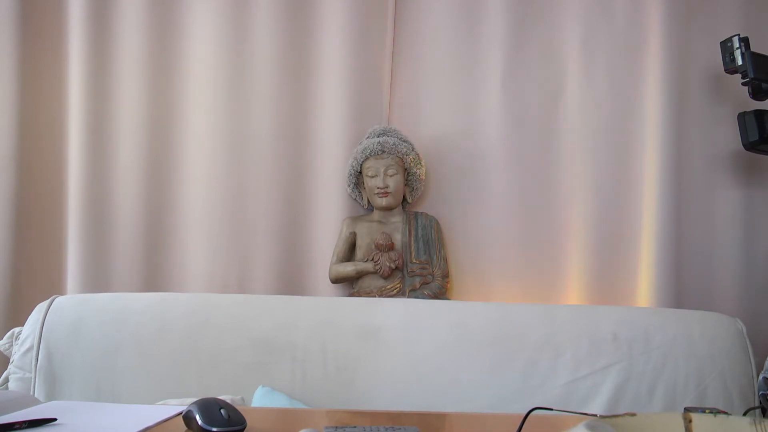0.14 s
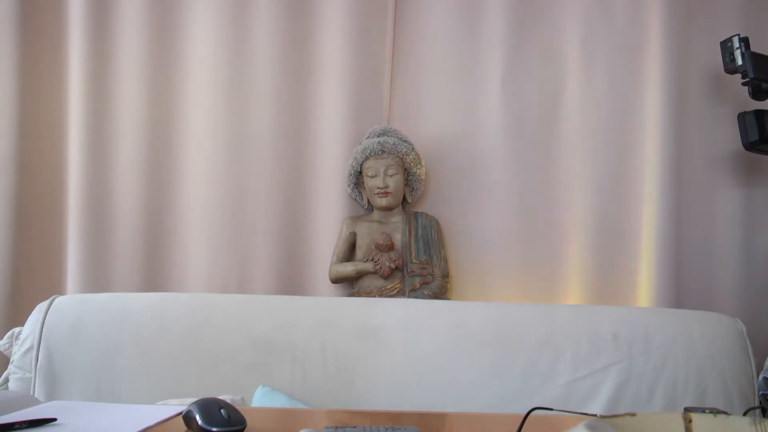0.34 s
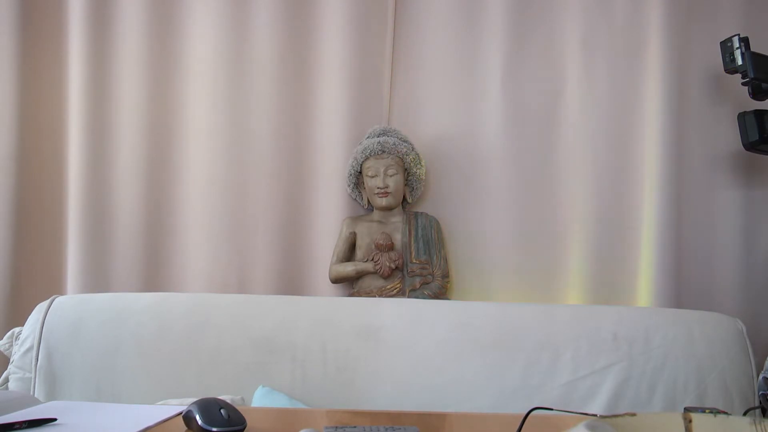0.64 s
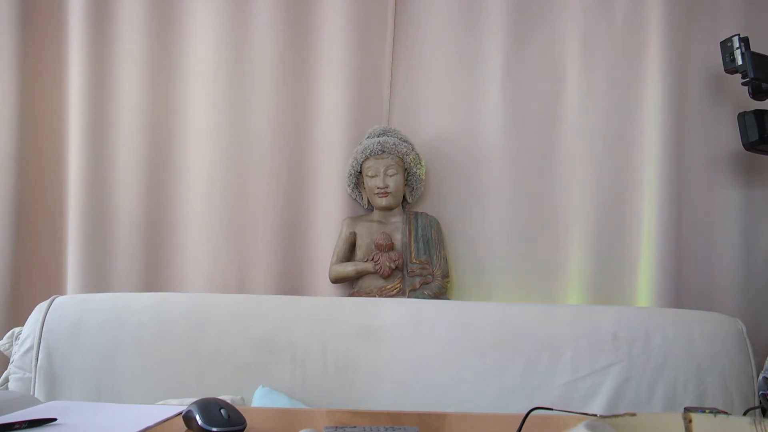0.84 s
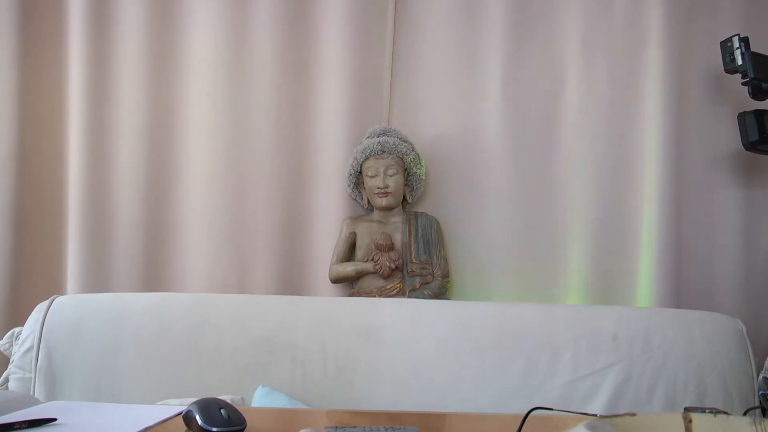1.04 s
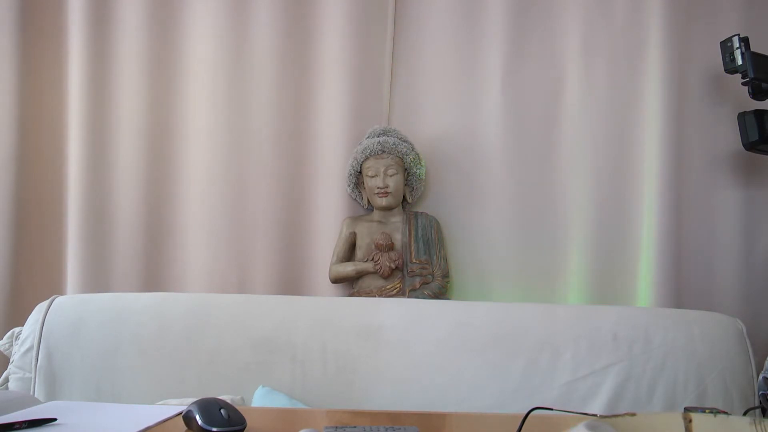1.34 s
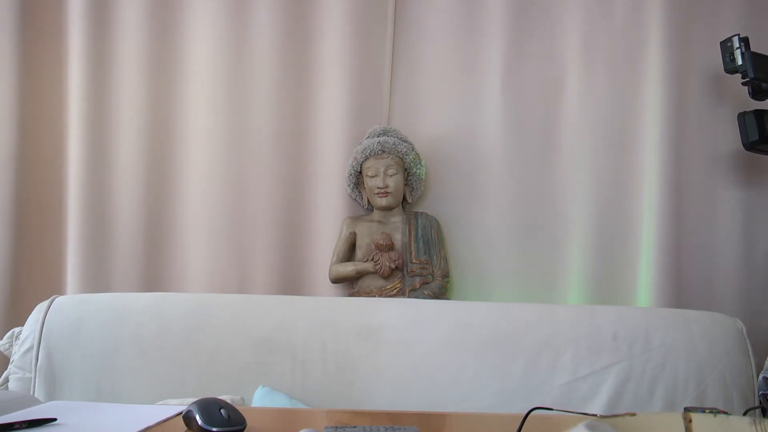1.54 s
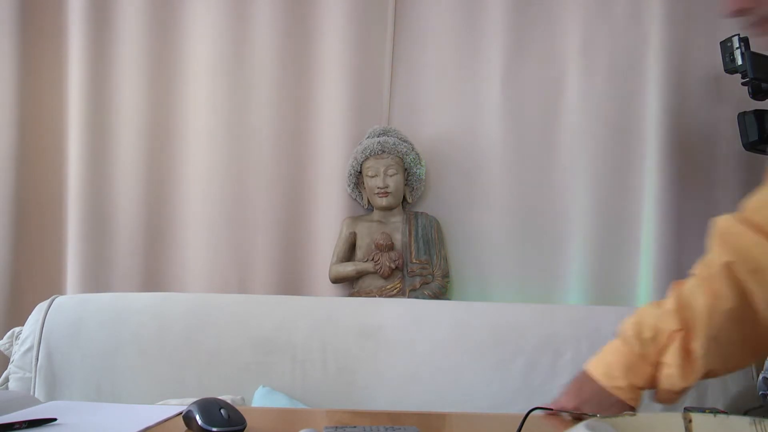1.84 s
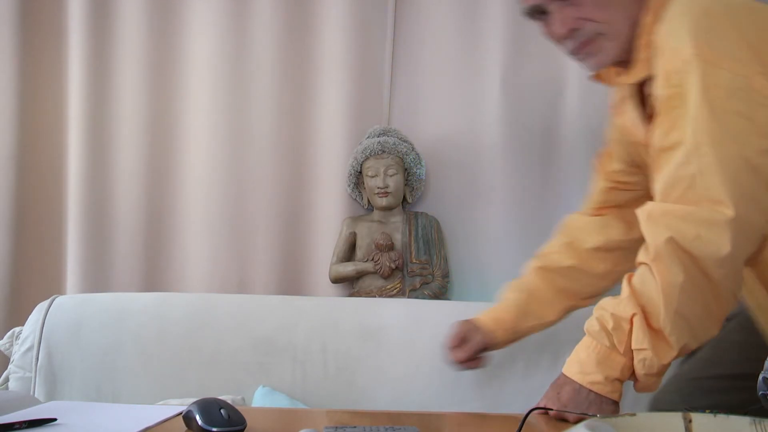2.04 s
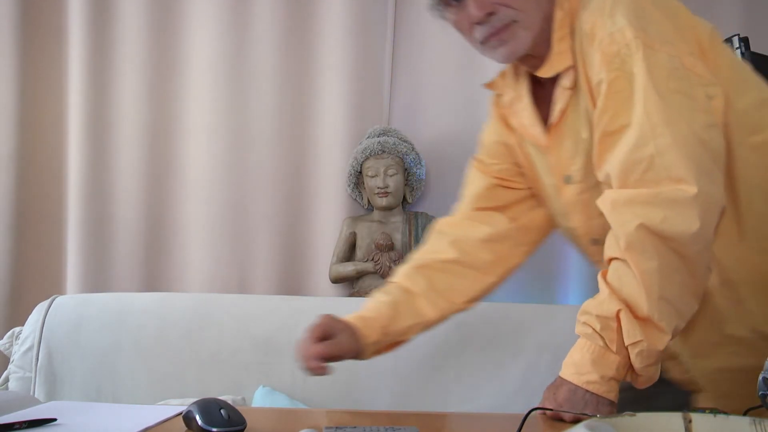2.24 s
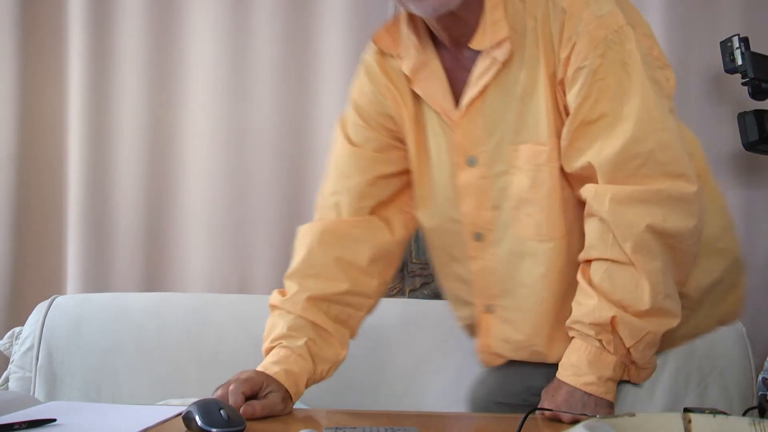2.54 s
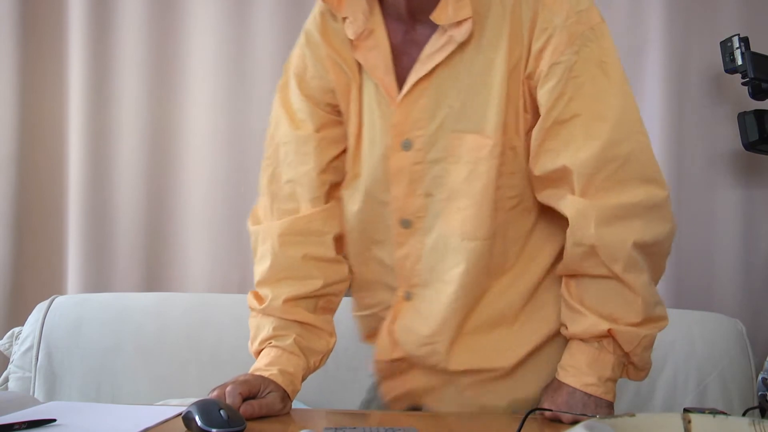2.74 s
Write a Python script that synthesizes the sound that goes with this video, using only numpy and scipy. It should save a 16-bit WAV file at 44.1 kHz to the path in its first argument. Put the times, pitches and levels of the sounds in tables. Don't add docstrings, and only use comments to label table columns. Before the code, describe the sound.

Deep hollow thumps on a wooden desk, first a short cluster, then heavier knocks with rattles and ticks as someone leans on it, clothes rustling softly; quiet room, close microphone on the desk.

```python
import sys
import numpy as np
from scipy import signal
from scipy.fft import rfft, irfft
from scipy.io import wavfile
from scipy.ndimage import uniform_filter1d

SR = 44100
rng = np.random.default_rng(int(sys.argv[2]) if len(sys.argv) > 2 else 0)


def wav_record(signal):
    frames = np.transpose(np.atleast_2d(signal))
    bounded = np.clip(frames, -1, 1)
    quanta = np.round(bounded * 32767).astype(np.int16)
    wavfile.write(sys.argv[1], SR, quanta)


def convert_level_to_amplitude(level_db):
    exponent = np.asarray(level_db, float) / 20
    return 10 ** exponent


N = 127890
T = np.arange(N) / SR


def evened(x):
    return x / np.sqrt(np.mean(x ** 2) + 1e-20)


def read(points, hz):
    f, value = np.transpose(points)
    return np.interp(np.log(hz + 1), np.log(f + 1), value)


def add(mix, s, sound):
    part = mix[round(s * SR):][:len(sound)]
    part += sound[:len(part)]


def noise(shape, patchy_db=0., flicker_db=0., field_db=0.):
    frames, hz = N // 128 + 5, np.fft.rfftfreq(512, 1 / SR)
    a, b, patches = rng.standard_normal((frames, 257, 3)).T
    patches = uniform_filter1d(patches, size=8, axis=0)
    patches = evened(uniform_filter1d(patches, size=10, axis=1))
    flicker = evened(uniform_filter1d(rng.standard_normal(frames), size=3))
    level_db = read(shape, hz)[:, None] + patchy_db * patches + flicker_db * flicker
    z = (a + 1j * b) * convert_level_to_amplitude(level_db)
    plain = signal.istft(z, nperseg=512, noverlap=384)[1]
    moved = signal.istft(z * convert_level_to_amplitude(field_db), nperseg=512, noverlap=384)[1]
    return moved[:N] / np.std(plain)


def tint(x, shape, share=0.98):
    gain_db = share * read(shape, np.fft.rfftfreq(len(x), 1 / SR))
    return irfft(rfft(x) * convert_level_to_amplitude(gain_db), len(x))


def swell(t, rise, t60):
    rise = max(rise, 1e-4)
    attack = np.sin(np.pi / 2 * np.minimum(t / rise, 1)) ** 2
    return attack * convert_level_to_amplitude(-60 * np.maximum(t - rise, 0) / t60)


# f/Hz, level/dB
ROOM_TONE = [(12, -18), (20, -10), (65, -33), (101, -9), (123, 7.5), (422, -43), (459, 10), (499, -19),
             (16000, -25.5)]


def hush():
    hum = np.sin(2 * np.pi * 96 * T) * (1 + .25 * np.sin(2 * np.pi * 2.3 * T))
    return convert_level_to_amplitude(-69.5) * evened(tint(rng.standard_normal(N), ROOM_TONE)) + convert_level_to_amplitude(-59) * hum


# f/Hz, level/dB
HISS_TONE = [(59, -42), (100, -16), (415, -21), (461, -10), (818, -21), (16000, 7)]


def hiss():
    return convert_level_to_amplitude(-86) * evened(tint(rng.standard_normal(N), HISS_TONE))


# t/s, level/dB
RUSTLE_LEVEL = [(0, -59.5), (.07, -64), (.17, -57.5), (.33, -65.5), (.62, -60.5), (.7, -48.5), (.84, -63.5),
                (1.18, -60), (1.22, -52.5), (1.3, -53), (1.43, -52.5), (1.57, -56), (1.64, -52.5),
                (1.84, -58), (1.9, -48.5), (2.02, -55.5), (2.2, -56), (2.49, -52.5), (2.9, -50)]
# f/Hz, level/dB
CLOTH_TONE = [(150, 1.5), (300, -5.5), (650, 1.5), (950, -7.5), (1400, -7.5), (2600, -11.5), (3800, -10),
              (4900, -18), (16000, -39)]


def rustle():
    t = np.arange(N // 128 + 5) * 128 / SR
    level_db = np.interp(t, *np.transpose(RUSTLE_LEVEL))
    return noise(CLOTH_TONE, patchy_db=1.0, flicker_db=0.65, field_db=level_db)


# middle t/s, half length t/s, level/dB
SLEEVES = [(0, 0.046, -60.5), (0.157, 0.14, -69.5), (0.707, 0.075, -74), (1.246, 0.013, -58),
           (1.437, 0.075, -62.5), (1.652, 0.029, -58.5), (1.857, 0.096, -60.5), (1.887, 0.029, -54),
           (2.055, 0.06, -57.5), (2.26, 0.11, -60.5), (2.485, 0.034, -53.5), (2.625, 0.03, -62),
           (2.806, 0.1, -59), (2.45, 0.41, -64)]
# f/Hz, level/dB
SHEEN_TONE = [(2000, 1.5), (4500, 1.5), (7000, -2.5), (10000, -11), (13500, -9), (16000, -25)]


def brushes():
    power = sum(convert_level_to_amplitude(db) ** 2 * np.exp(-((T - s) / half) ** 2) for s, half, db in SLEEVES)
    return np.sqrt(power) * noise(SHEEN_TONE, patchy_db=3.0)


# t/s, level/dB
WEIGHT_LEVEL = [(0.0, -57.5), (.15, -55), (.4, -63.5), (0.9, -54.5), (1.05, -59.5), (1.17, -53),
                (1.4, -63.5), (1.55, -61.5), (1.66, -43.5), (1.75, -42.5), (1.81, -48.5), (2.0, -43.5),
                (2.23, -48), (2.37, -45.5), (2.6, -38.5), (2.75, -39.5), (2.9, -44)]
# f/Hz, width f/Hz, level/dB
DESK_MODES = [(41.6, 28, -7.5), (92.7, 51, -4.5), (167.8, 58, -5), (270.3, 51, -10), (367, 82, -16)]


def weight():
    hz, z = np.fft.rfftfreq(N, 1 / SR), rfft(rng.standard_normal(N))
    body = sum(convert_level_to_amplitude(db) / (1 + 2j * (hz - f) / w) ** 2 * np.sqrt(20 / w) for f, w, db in DESK_MODES)
    return evened(irfft(z * body, N)) * convert_level_to_amplitude(np.interp(T, *np.transpose(WEIGHT_LEVEL)) - 2.0)


# t/s, peak level/dB, sway f/Hz, rise t/s, decay t60/s
DESK_SWAYS = [(.03, -51.5, 40.8, 0.052, 1.1), (1.021, -42, 29.96, 0.052, 1.04),
              (1.29, -46, 30.6, 0.023, 2.5), (.666, -23.5, 34.31, 0.021, 0.72),
              (1.154, -33, 31.1, 0.081, 0.23), (1.872, -15.5, 30.85, 0.045, 0.67),
              (2.119, -33, 30.84, 0.026, 1.5), (2.33, -34, 33.6, 0.045, 1.6),
              (2.4754, -11.5, 32.99, 0.03, 0.61), (2.713, -33.5, 36.2, 0.017, 0.23),
              (2.801, -33.5, 35.6, 0.013, 1.1)]


def sways():
    rap_sharpness, rap_power, rap_lag = 13.4, 1.497, 0.017
    out, t = np.zeros(N), T[:SR]
    for s, db, hz, rise, t60 in DESK_SWAYS:
        size = convert_level_to_amplitude(db) * swell(t, rise, t60)
        sway = -size * np.sin(2 * np.pi * hz * t)
        rap = np.exp(rap_sharpness * (-np.sin(2 * np.pi * (hz * t - rap_lag)) - 1))
        add(out, s, sway + convert_level_to_amplitude(10) * size ** rap_power * (rap - rap.mean()))
    return out


# t/s, length t/s, level/dB, f/Hz, share of pitch lost
CHAIR_SQUEAKS = [
    (0.532, 0.015, -47.5, 2590, 0.0029),
    (0.547, 0.03, -53.5, 2554, 0.0091),
    (1.497, 0.0355, -53.5, 2530, 0.12),
]


def squeaks():
    out = np.zeros(N)
    for s, length, db, hz, sag in CHAIR_SQUEAKS:
        t = T[:round(length * SR)]
        phase = 2 * np.pi * hz * t * (1 - sag / 2 * t / length)
        blur = np.cumsum(.11 * rng.standard_normal(len(t)))
        tone = np.sin(phase + blur / 2) + convert_level_to_amplitude(-10) * np.sin(1.48 * phase + blur)
        add(out, s, convert_level_to_amplitude(db) * np.sin(np.pi * t / length) ** 0.52 * tone)
    return out


# t/s, peak level/dB, body f/Hz, crack level/dB, crack dulls above f/Hz
CONTACTS = [(.638, -39, 640, -72, 1500), (.76, -42, 704, -82, 2000), (1.2, -39.5, 716, -57, 3500),
            (1.474, -39.5, 587, -52, 3020), (1.827, -48, 550, -54.5, 7000), (1.895, -32, 586, -53, 3500),
            (1.929, -33, 715, -55, 2500), (2.106, -38.5, 1120, -75, 1500), (2.252, -46, 580, -66, 2000),
            (2.308, -31, 446, -48, 1790), (2.365, -40, 452, -66, 1200), (2.3966, -33, 680, -37.5, 15000),
            (2.403, -29.5, 590, -49, 3000), (2.4178, -31, 462, -38.5, 6440), (2.457, -38, 495, -51, 1600),
            (2.482, -34.5, 594, -49, 2500), (2.514, -35.5, 1500, -50, 2170), (2.554, -42, 800, -62, 1500),
            (2.6, -36.5, 600, -60, 1300), (2.659, -36.5, 900, -64, 1800), (2.668, -35.5, 866, -72, 1500),
            (2.709, -46, 1408, -62, 3020), (2.756, -33, 617, -44, 7000), (2.767, -30, 673, -55, 2480),
            (2.824, -36, 590, -66, 1500), (2.865, -37.5, 510, -70, 1500)]
# f/Hz, level/dB
CRACK_TONE = [(700, -4.5), (1200, 0), (3700, 8), (6500, 0.5), (9000, -17), (16000, -21)]


def ticks():
    out, t = np.zeros(N), T[:4096]
    for s, db, hz, crack_db, top_hz in CONTACTS:
        grit = rng.standard_normal(len(t))
        around_body = [(hz / 2, -20), (hz, 0), (2 * hz, -9), (4 * hz, -32), (12 * hz, -80)]
        fuzz = evened(tint(grit, around_body))
        body = .75 * np.sin(2 * np.pi * hz * t) + .4 * fuzz
        ring = swell(t, 0.00053, 32 / hz) * body
        dulled = tint(tint(grit, CRACK_TONE), [(top_hz, 0), (4 * top_hz, -36)])
        crack = evened(dulled) * swell(t, .0007, .016)
        add(out, s, convert_level_to_amplitude(db - 3) * ring + convert_level_to_amplitude(crack_db + 5) * crack)
    return out


# t/s, peak level/dB, ring f/Hz, rise t/s, decay t60/s
BLOWS = [(.64, -18, 71, 0.0067, 0.076), (0.6544, -12.5, 74.9, 0.0078, 0.29),
         (0.639, -27.5, 147, 0.004, 0.37), (0.6935, -26, 126, 0.0052, 0.021),
         (0.7051, -13.5, 88.7, 0.0048, 0.12), (.7, -26.5, 172.3, 0.009, 0.3), (.729, -24, 79, 0.0052, 0.07),
         (0.7399, -22, 76.5, 0.0084, 0.074), (.762, -23.5, 70, 0.0054, 0.083),
         (0.776, -26.5, 89.5, 0.0065, 0.043), (.786, -28, 60.5, .005, 0.03),
         (0.846, -33.5, 60.7, 0.0018, 0.38), (1.139, -44, 170.7, 0.016, 0.16),
         (1.469, -51, 170, 0.018, 0.19), (1.595, -47, 98, 0.014, 0.19), (1.65, -51, 102, .012, 0.13),
         (1.662, -41, 200, 0.011, 0.085), (1.712, -39.5, 170, 0.031, 0.2),
         (1.8286, -7, 150.4, 0.0037, 0.02), (1.844, -22, 202.2, 0.0035, 0.27),
         (1.8606, -4, 105, 0.005, 0.031), (1.882, -18.5, 108, 0.0036, 0.05),
         (1.924, -24, 138, 0.0045, 0.14), (2.086, -33, 179.6, 0.006, 0.082),
         (2.397, -24, 160, 0.0025, 0.039), (2.403, -22, 200, 0.0022, 0.04),
         (2.4184, -21, 180, 0.003, 0.047), (2.43, -30.5, 188, 0.0055, 0.1),
         (2.451, -24.5, 119, 0.0096, 0.09), (2.477, -8.5, 59, 0.006, 0.049),
         (2.4924, -16, 83, 0.0094, 0.046), (2.507, -12, 65.3, 0.012, 0.37), (2.673, -24, 60, 0.0022, 0.16),
         (2.551, -14.5, 82, .01, 0.012), (2.582, -16, 85.6, 0.0054, 0.12), (0.904, -32.5, 62, 0.0082, 0.2)]
# f/Hz, level/dB
RATTLE_TONE = [(120, -25), (260, 0), (380, -3), (560, -11), (750, -24), (2000, -50)]


def knocks():
    out, shake_power, t = np.zeros(N), np.zeros(N), T[:SR // 2]
    for s, db, hz, rise, t60 in BLOWS:
        add(out, s, -convert_level_to_amplitude(db) * swell(t, rise, t60) * np.sin(2 * np.pi * hz * t))
        shake = convert_level_to_amplitude(db) * hz / 150 * swell(t, 0.0016, .2)
        add(shake_power, s, shake ** 2)
    return out + convert_level_to_amplitude(-26) * np.sqrt(shake_power) * noise(RATTLE_TONE, patchy_db=2.5)


# middle t/s, half length t/s, level/dB
FOREARM = (1.93, 0.031, -40)
# f/Hz, level/dB
FOREARM_TONE = [(300, 3.5), (900, -0.5), (3000, -14), (5000, -46)]


def slide():
    s, half, db = FOREARM
    return convert_level_to_amplitude(db) * np.exp(-((T - s) / half) ** 2 / 2) * noise(FOREARM_TONE)


# f/Hz, left minus right level/dB
BASS_LEAN = [(60, 1.0), (300, 0.82), (600, 0.23), (2380, 0.4), (15000, 0.4)]
# f/Hz, level/dB
CLOTH_WIDTH = [(300, -40), (1000, -31), (2500, -28.5), (5000, -23), (10000, -22), (16000, -18)]


def scene():
    taps = ticks()
    mid = hush() + convert_level_to_amplitude(2.0) * rustle() + brushes() + weight()
    mid = mid + sways() + squeaks() + taps + knocks() + slide()
    side = tint(convert_level_to_amplitude(1.0) * rustle() + brushes(), CLOTH_WIDTH) + hiss()
    side = side + convert_level_to_amplitude(-26.5) * np.roll(taps, 9)
    return np.array([tint(mid, BASS_LEAN, 0.39) + side, tint(mid, BASS_LEAN, -0.64) - side])


def band_limit(x):
    return signal.sosfilt(signal.butter(12, 16390, fs=SR, output="sos"), x)


def record(dry):
    edge = signal.firwin(511, 15740, window=("kaiser", 9), fs=SR)[None]
    mix = signal.oaconvolve(dry, edge, "same")
    return band_limit(mix)


dry = scene()
out = record(dry)
wav_record(out)
```